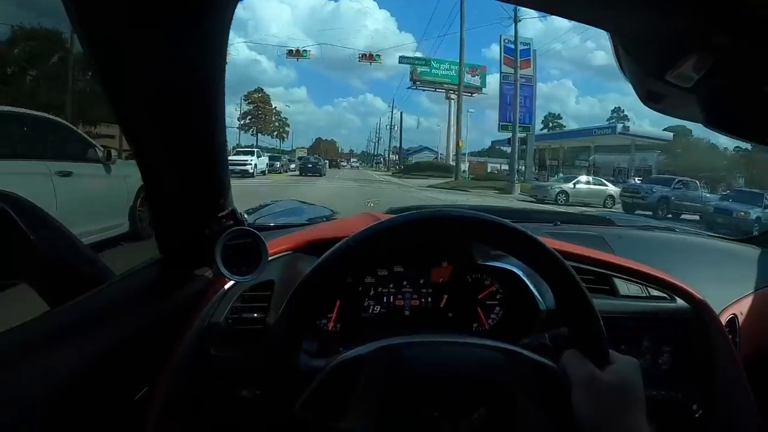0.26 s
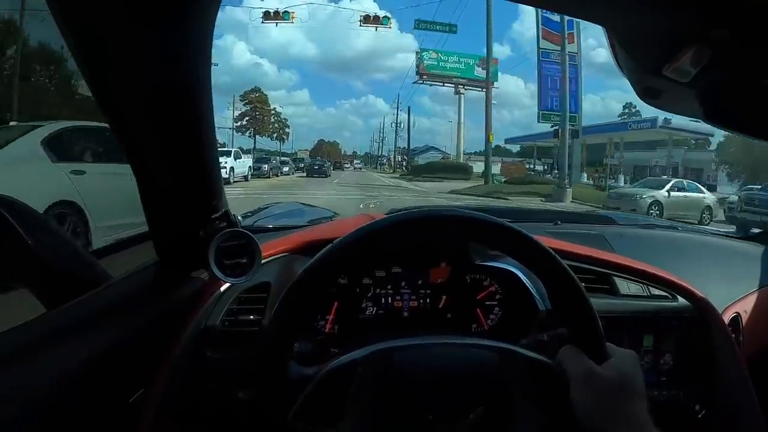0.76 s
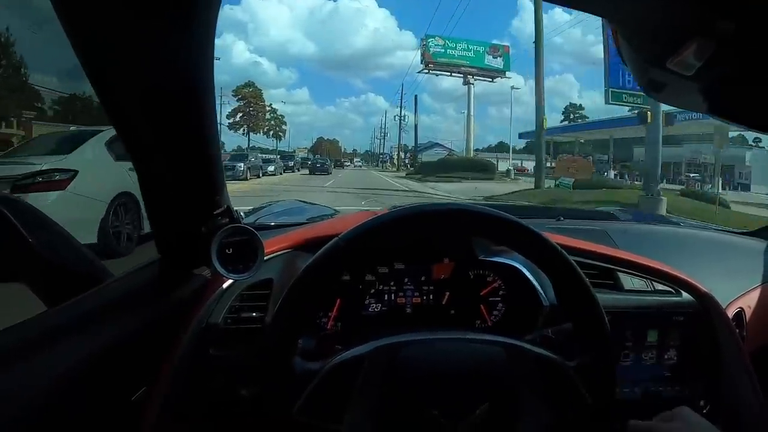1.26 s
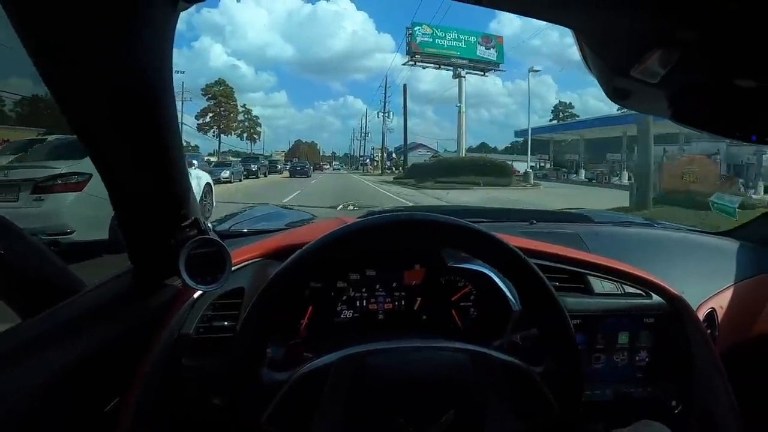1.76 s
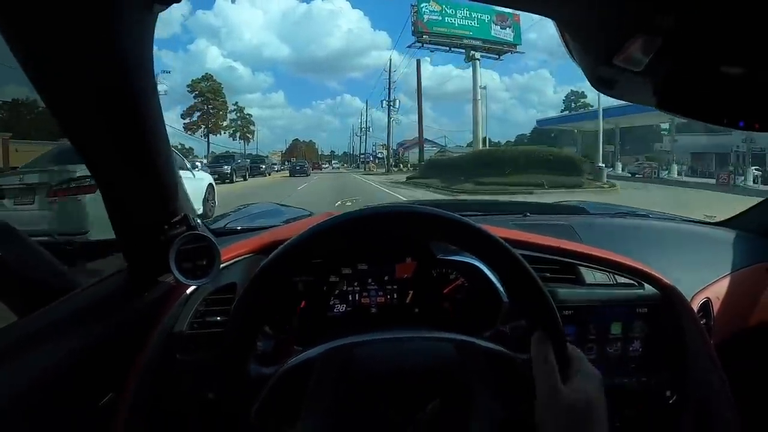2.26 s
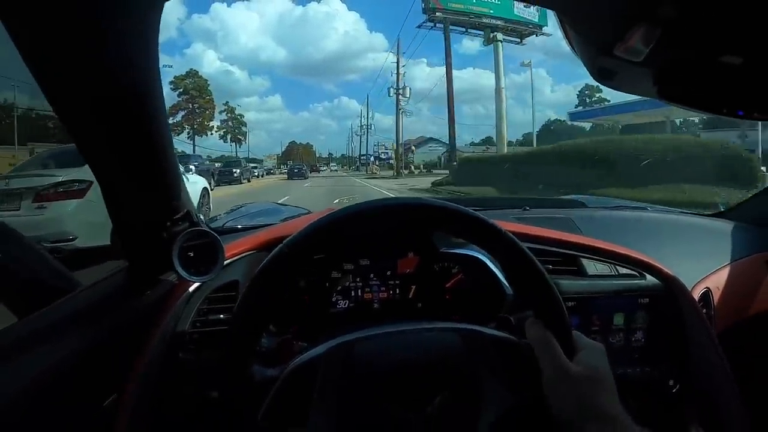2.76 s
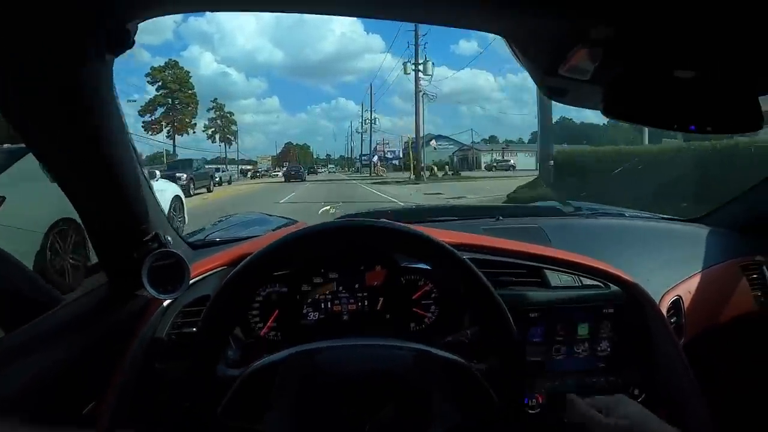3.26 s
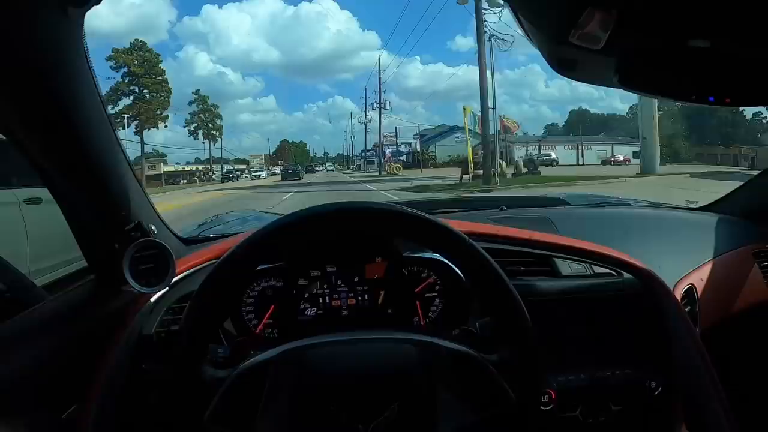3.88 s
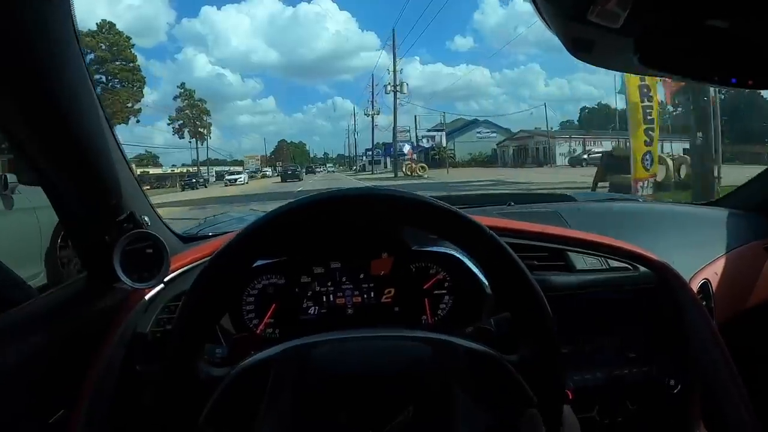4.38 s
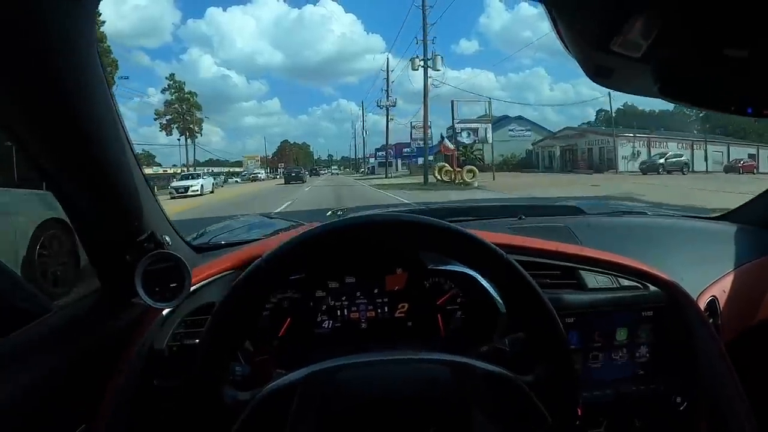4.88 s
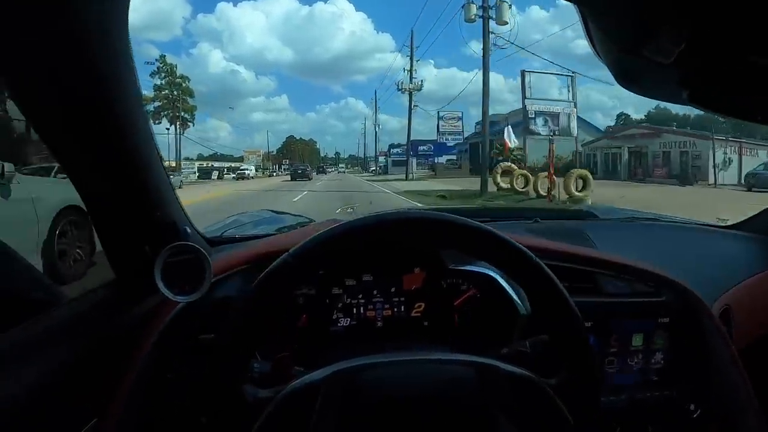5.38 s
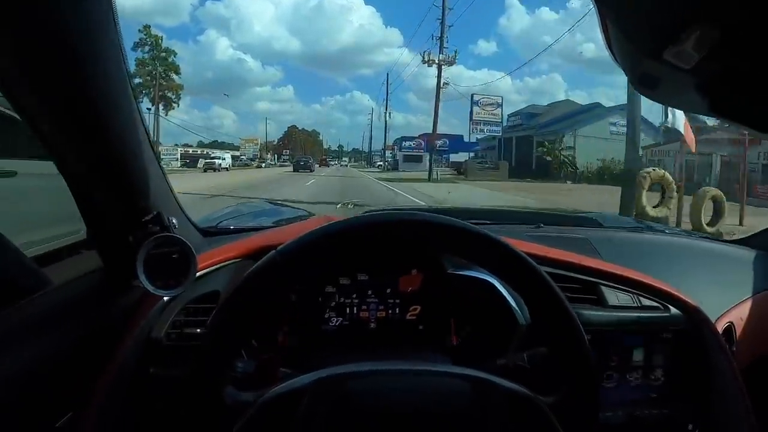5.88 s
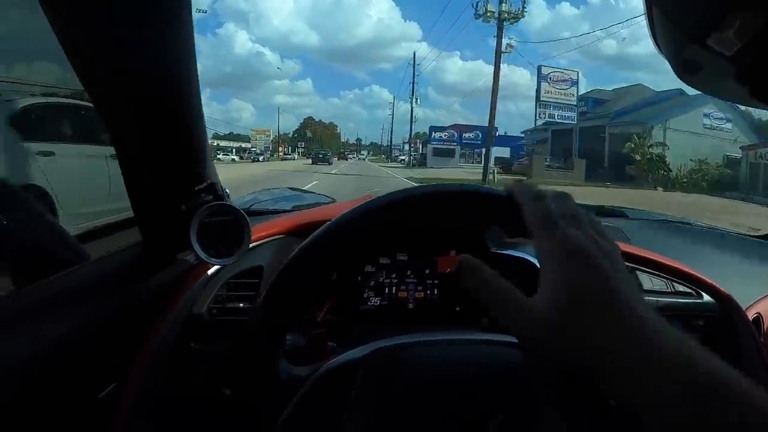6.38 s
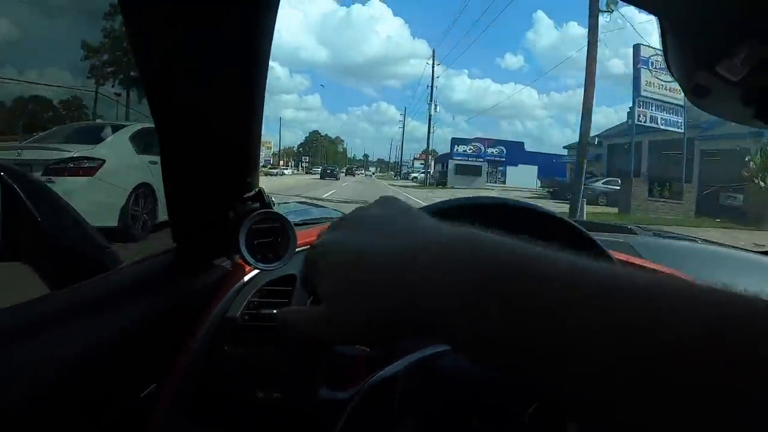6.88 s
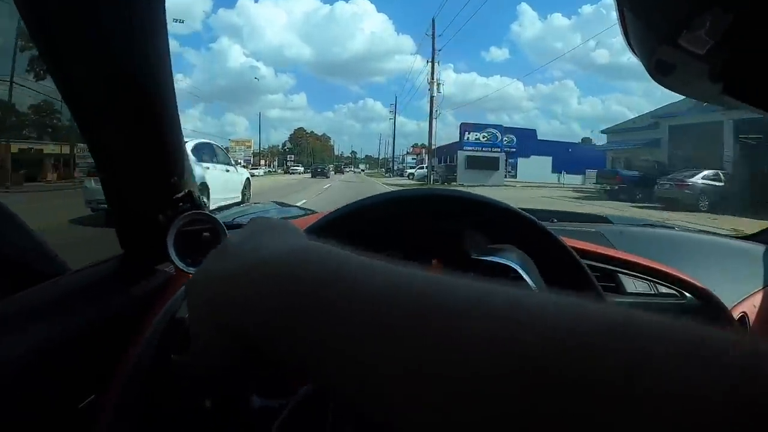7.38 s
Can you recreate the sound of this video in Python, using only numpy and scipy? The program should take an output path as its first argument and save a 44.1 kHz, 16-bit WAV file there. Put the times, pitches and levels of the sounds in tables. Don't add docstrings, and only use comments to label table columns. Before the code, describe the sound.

Close, boomy car-interior sound: low tyre and panel roar under a muffled eight-cylinder exhaust. The engine climbs under load with airy intake hiss, bursts into a hard pull, lifts off and shifts with dull drive-line knocks. A softer, uneven coasting rumble follows. Near six seconds a sharp blip and a weaker one flare up, then the note slides down, with a few dry clicks.

```python
import sys
import numpy as np
from scipy import signal
from scipy.io import wavfile
from scipy.ndimage import uniform_filter1d

SR = 44100
rng = np.random.default_rng(int(sys.argv[2]) if len(sys.argv) > 2 else 0)


def voltage_ratio(decibels):
    exponent = np.asarray(decibels, float) / 20
    return 10 ** exponent


def digitize_waveform(pressure):
    field = np.atleast_2d(pressure).T
    bounded = np.clip(field, -1, 1)
    quanta = np.round(bounded * 32767).astype(np.int16)
    wavfile.write(sys.argv[1], SR, quanta)


N = 336968
TIME = np.arange(N) / SR


def evened(x):
    return x / np.sqrt(np.mean(x ** 2) + 1e-20)


def smooth(x, first, second):
    return uniform_filter1d(uniform_filter1d(x, size=first), size=second)


def read(points, hz):
    f, value = np.transpose(points)
    return np.interp(np.log(hz + 1), np.log(f + 1), value)


def curves(rows, t=TIME):
    s, *columns = np.transpose(rows)
    return [np.interp(t, s, c) for c in columns]


def held(t, start, end, rise, fall):
    return np.clip(np.minimum((t - start) / rise, 1 - (t - end) / fall), 0, 1)


def bumps(rows, t=TIME):
    return sum(db * np.exp(-((t - s) / np.where(t < s, rise, fall)) ** 2) for s, db, rise, fall in rows)


def noise(spectrum, patchy_db):
    frames, hz = N // 512 + 8, np.fft.rfftfreq(2048, 1 / SR)
    real, imag, patches = rng.standard_normal((frames, 1025, 3)).T
    patches = uniform_filter1d(patches, size=12, axis=0)
    patches = evened(uniform_filter1d(patches, size=6, axis=1))
    level_db = read(spectrum, hz)[:, None] + patchy_db * patches
    z = (real + 1j * imag) * voltage_ratio(level_db)
    return evened(signal.istft(z, nperseg=2048, noverlap=1536)[1][:N])


# time in seconds, speed in rpm.
SPEED = [(0, 2102), (1.0, 2540), (2.0, 3038), (2.65, 3445), (2.78, 3698), (3.11, 4730), (3.22, 4780),
         (3.29, 4220), (3.4, 3950), (3.97, 3014), (4.3, 2830), (5.4, 2618), (5.8, 2455), (6.0, 2311),
         (6.06, 2450), (6.18, 3415), (6.4, 3260), (7.64, 1765)]
LURCH_S, LURCH_RPM, LURCH_HZ, LURCH_DECAY_S = 3.99, 90.3, 2.75, .4


def speed(t=TIME):
    since = np.maximum(t - LURCH_S, 0)
    swing = np.exp(-since / LURCH_DECAY_S) * np.sin(2 * np.pi * LURCH_HZ * since)
    return curves(SPEED, t)[0] + LURCH_RPM * swing


def cycles():
    return np.cumsum(speed()) / 120 / SR


# down in seconds, up in seconds, travel in seconds.
PEDAL = [
    (-1, 3.21, .035),
    (6.028, 6.208, .012),
    (6.295, 6.352, .014),
]
# down in seconds, up in seconds, travel in seconds, opening 0-1.
TOUCHES = [
    (3.879, 4.074, 0.054, 0.14),
    (5.7, 5.965, 0.063, 0.04),
    (6.954, 7.2, 0.056, 0.1),
]


def pedal(t=TIME):
    light = sum(np.clip(share, 0, 1) * held(t, down, up, travel, travel)
                for down, up, travel, share in TOUCHES)
    full = sum(held(t, down, up, travel, travel) for down, up, travel in PEDAL)
    return np.minimum(light + full, 1)


# time in seconds, gas flow in dB re full load, exhaust level in dB.
LOAD = [(0, -18, -34.5), (.5, -14.5, -30), (1.05, -10.5, -30.5), (1.4, -12.5, -27.5), (1.9, -14, -27),
        (2.3, -12, -29.5), (2.58, -8.5, -27.5), (2.77, -1, -24.5), (2.93, -2, -26.5), (3.08, 1.5, -26),
        (3.23, -0.5, -27), (3.27, -15, -28), (4.02, -15, -30), (4.2, -19, -31), (5.2, -19, -35),
        (5.9, -17, -30.5), (6.6, -19.5, -32), (7.64, -24, -37)]
# extra gas flow in dB, extra exhaust in dB.
BLIPS = [
    (14.5, 4.5),
    (8.5, 3),
]
BLIP_RISE_S, BLIP_FALL_S = 0.073, 0.041
BARK_S = .012


def load(t=TIME):
    flow_db, level_db = curves(LOAD, t)
    presses = list(zip(PEDAL[1:], BLIPS))
    blip_db = sum(db * held(t, a, b, BLIP_RISE_S, BLIP_FALL_S) for (a, b, _), (db, _) in presses)
    bark_db = sum(db * held(t, a, b, BARK_S, BARK_S) for (a, b, _), (_, db) in presses)
    return flow_db + blip_db, level_db + bark_db, blip_db


# time in seconds, depth in dB, width in seconds.
STUMBLES = [
    (3.27, 3.5, 0.018),
    (4.105, 11, 0.022),
    (4.25, 10, 0.02),
    (6.008, 8, 0.018),
    (6.245, 9, 0.018),
    (6.935, 7, 0.02),
]


def lost(t=TIME):
    return sum(db * np.exp(-((t - s) / width) ** 2) for s, db, width in STUMBLES)


# frequency in Hz, density in dB per Hz.
ROAD = [(20, -21), (40, -14.5), (65, -20.5), (90, -6), (200, -3), (350, -9), (600, -17.5), (900, -39),
        (1500, -41), (3500, -110)]
# time in seconds, swell in dB, rise in seconds, fall in seconds.
SHAKES = [
    (1, -6.5, 0.34, 0.65),
    (2.65, 0, 0.39, .2),
    (3.24, 9.5, 0.11, 0.16),
    (4, -1, 0.32, .4),
    (6.3, 2.5, .1, 0.44),
]
ROAR_DB = -27


def road():
    return voltage_ratio(ROAR_DB + bumps(SHAKES)) * noise(ROAD, patchy_db=2.5)


# time in seconds, peak in dB, length in seconds, dull above in Hz.
TICKS = [(0.185, -37.5, 0.026, 3000), (1.865, -45, 0.084, 8000), (2.018, -44, 0.053, 5000),
         (5.98, -44, .12, 2937), (6.815, -32, 0.077, 2501), (7.012, -39, 0.063, 2986),
         (7.265, -60, 0.048, 9000), (7.445, -61, 0.041, 8026)]


def ticks():
    out, t = np.zeros(N), np.arange(4000) / SR
    for s, db, t60_s, dull_hz in TICKS:
        level = voltage_ratio(db - 60 * t / max(t60_s, .005)) * np.minimum(t / 0.006, 1)
        crack = rng.standard_normal(len(t)) * level
        dull = signal.butter(2, dull_hz, fs=SR, output="sos")
        part = out[round(s * SR):][:len(t)]
        part += signal.sosfilt(dull, crack)[:len(part)]
    band = signal.butter(5, [1300, 10800], "band", fs=SR, output="sos")
    return signal.sosfilt(band, out)


# time in seconds, level in dB, frequency in Hz, t60 in seconds.
THUDS = [
    (3.22, -14.5, 94.9, 0.23),
    (4.125, -15, 97, 0.17),
    (4.272, -17, 91.86, 0.21),
    (6.248, -14, 97, 0.22),
]


def thuds():
    out, t = np.zeros(N), np.arange(SR // 2) / SR
    for s, db, hz, t60_s in THUDS:
        boom = voltage_ratio(db - 60 * t / t60_s) * np.sin(2 * np.pi * hz * t)
        out[round(s * SR):][:len(t)] += boom * (1 - np.exp(-t / 0.032))
    return out


# start in seconds, end in seconds, level in dB, fade in seconds.
WHINE = (3.97, 4.65, -60, .08)
# time in seconds, swell in dB, rise in seconds, fall in seconds.
WHINE_SWELLS = [
    (4.18, 6, .05, .05),
    (4.32, 9, .04, .16),
]
TEETH_PER_CYCLE = 59.3


def gears():
    start, end, db, fade = WHINE
    level = held(TIME, start - fade, end, fade, fade) ** 2 * voltage_ratio(db + bumps(WHINE_SWELLS))
    return level * np.sqrt(2) * np.cos(2 * np.pi * TEETH_PER_CYCLE * cycles())


def firing_puffs(firings):
    cylinder = voltage_ratio(2.0 * rng.standard_normal(8))[firings.astype(int) % 8]
    return smooth(0.87 + cylinder * np.exp(-(firings % 1) / 0.47), 50, 40)


def repeated_burns(firings):
    multiple = np.arange(513)
    heights = voltage_ratio(4 * rng.standard_normal(513) + 4 * (multiple % 4 == 0))
    heights = heights * (multiple > 40) * (multiple < 110)
    shape = np.fft.irfft(heights * np.exp(2j * np.pi * rng.random(513)))
    slip = .025 * evened(smooth(rng.standard_normal(N), 3000, 3000))
    place = (firings + slip) % 8 * 128
    return evened(np.interp(place, np.arange(1025), np.append(shape, shape[0])))


# frequency in Hz, density in dB per Hz.
RASP = [(400, -37), (640, -1), (730, -2.5), (800, 0), (890, -3), (1000, -7), (1120, -4), (1210, -13.5),
        (1350, -10.5), (1600, -18), (2100, -21), (2500, -27), (3200, -35), (5000, -68)]
RASP_DB = -29.58


def rasp(firings, puffs, flow_db):
    hz, throttle = np.fft.rfftfreq(N, 1 / SR), pedal()
    tones = np.fft.irfft(np.fft.rfft(repeated_burns(firings)) * voltage_ratio(read(RASP, hz)), N)
    puffed = evened(noise(RASP, patchy_db=2.0) * puffs)
    return voltage_ratio(RASP_DB + flow_db) * ((1.3 - .65 * throttle) * puffed + (1 + 3.3 * throttle) * tones)


# frequency in Hz, density in dB per Hz.
HISS = [(1200, -31), (2200, 0), (3000, -5), (4000, -7.5), (5000, -11), (6500, -22), (9000, -60)]
# frequency in Hz, density in dB per Hz.
AIR = [(3500, -26), (5500, -1), (6500, -2), (8000, -6), (9500, -9), (10500, -12), (11300, -18),
       (12000, -29), (13500, -45), (15000, -90)]
# time in seconds, swell in dB, rise in seconds, fall in seconds.
GULPS = [
    (.76, 8, .2, 0.21),
    (1.25, 2.5, 0.27, 0.3),
    (2.97, 1.5, 0.11, 0.081),
    (4.0, 2, .06, .04),
    (5.99, 8, .03, .025),
    (6.1, 5.5, 0.047, 0.026),
    (6.6, 3.5, .08, .08),
    (7.18, 7.5, .07, .06),
]
# time in seconds, swell in dB, rise in seconds, fall in seconds.
BYPASS = [
    (1.1, 2.5, 0.2, .3),
    (3.0, 1.5, .2, 0.15),
    (7.19, -5, .06, 0.068),
]
HISS_DB, AIR_DB = -46, -59.5
HISS_SHARE, AIR_SHARE = 0.84, 0.74


def intake(puffs, flow_db):
    gulp_db = bumps(GULPS)
    hiss_db = HISS_DB + HISS_SHARE * flow_db + gulp_db
    air_db = AIR_DB + AIR_SHARE * flow_db + gulp_db + bumps(BYPASS)
    hiss = evened(noise(HISS, patchy_db=-1.7) * (1.5 + puffs))
    return voltage_ratio(hiss_db) * hiss + voltage_ratio(air_db) * noise(AIR, patchy_db=.7)


def gas():
    firings, flow_db = 8 * cycles(), load()[0]
    puffs = firing_puffs(firings)
    return rasp(firings, puffs, flow_db) + intake(puffs, flow_db)


# multiple of the cycle rate, coasting in dB, pulling in dB.
ORDERS = [(2, -10, 6.5), (3, -5.5, -18), (4, 2.5, -7.5), (5, 4.5, -3), (6, 5.5, 2.5), (7, 6, 0.5),
          (8, 6.5, 13.5), (9, 2.1, 1), (10, 3.5, -1), (11, -6.5, 5), (12, 5, 0.6), (13, -7.5, -1.9),
          (14, 3, 7), (15, 4, 0.7), (16, 3, 11), (17, 2.5, -9), (18, 4.5, 3.5), (19, 2.5, -1.5),
          (20, -3, 3.2), (21, 4.5, -0.8), (22, 0, 6.5), (23, -1, -1), (24, -5.5, 7), (25, -10.5, 1),
          (26, 2, -16.5), (27, -1.5, 2.5), (28, -4.5, 4.5), (29, -0.5, -1), (30, -2.5, 4), (31, -8, 3),
          (32, -14.5, 4.5), (33, -18.5, 7), (34, -6, -1.5), (35, -22, 3.5), (36, -13, -14.5),
          (37, -10.5, 0.5), (38, 1, 5), (39, -11, -11), (40, -13, 0.5)]
# frequency in Hz, even coasting, even pulling, odd coasting, odd pulling, all in dB.
CABIN = [(52, -7.5, -24, -27.5, -4), (81, -2, -32, -6, -24.5), (91.86, 14, 11.5, 7.5, 15.5),
         (116.3, 1.5, 6.5, -2, 3.5), (137.6, 4.5, -3, -0.5, -11.5), (177, 1, 6, -3.5, -2.5),
         (210.5, 6, 3.5, -1, -4.5), (247.8, -16.5, -16.5, -18.5, -3.5), (301.2, -0.5, -1.1, -5.5, -1),
         (336.5, -11, 2.5, -5.5, -5.5), (369, -14.5, -4.5, -12, -5), (432, -6.5, -10, -13.5, -4),
         (558.5, -9, -8, -17, -9.5), (681, -24.5, -25, -22, -31.5)]
# frequency in Hz, gain in dB.
MUFFLER = [(700, -1.5), (740, 2.5), (810, -2), (900, 3.5), (1000, 1), (1110, 0.5), (1220, -17.5),
           (1700, -11.5)]
# speed in rpm, firing pulling, octave pulling, firing coasting,
# octave coasting, all in dB.
PIPES = [(1960, 7.5, -4.5, 7.5, -9), (2360, -1.5, 0, 4.5, 6), (2630, 0.5, 4, 1, 6.5),
         (2845, -5.5, -7, -1.5, 5.5), (3333, 8.5, 4, -3, -4.5), (3800, 16, 4, 6, -10),
         (4170, 11, 7.5, 11.5, 4), (4750, 1, 9, -1.5, -2)]
# from in seconds, to in seconds, unevenness in dB.
FREE = [
    (3.1, 4.3, 2.5),
    (5.9, 8, 1.5),
]
STEADY_DB, SETTLE_S, STRAIN_DB = 1.5, .2, 1.5
BITE_DB, BITE_SHARE, BITE_BLIP = 6.5, 0.5, 0.12
SHUDDER_DB, SHUDDER_RPM, SHUDDER_SPAN_RPM = 10.5, 3790, 500
BLIP_OVERTONES, BLIP_BETWEEN = 0.24, -0.13
PART_OPEN_DB = 4
FADING_DB, UPPER_STUMBLE = 3.5, .3


def exhaust():
    t, fine = TIME[::64], TIME[::8]
    rpm, throttle, (flow_db, level_db, blip_db) = speed(t), pedal(t), load(t)
    coasting = 1 - throttle
    pipes_db = curves(PIPES, rpm)
    firing_db, octave_db = throttle * pipes_db[:2] + coasting * pipes_db[2:]
    firing_db += PART_OPEN_DB * 4 * throttle * coasting
    free_db = sum(db * held(t, a, b, SETTLE_S, SETTLE_S) for a, b, db in FREE)
    uneven_db = STEADY_DB + free_db * coasting + STRAIN_DB * voltage_ratio(flow_db) * throttle
    bite_db = BITE_DB + BITE_SHARE * flow_db + BITE_BLIP * blip_db
    shudder_db = SHUDDER_DB * throttle * np.clip((rpm - SHUDDER_RPM) / SHUDDER_SPAN_RPM, 0, 1)
    knots_hz, *colours = np.transpose(CABIN)
    turn, out = 2 * np.pi * cycles()[::8], np.zeros(len(fine))
    for order, coast_db, pull_db in ORDERS:
        k = round(order)
        hz, odd = k * rpm / 120, k % 2
        coast, pull = (np.interp(np.log(hz), np.log(knots_hz), c) for c in colours[2 * odd:2 * odd + 2])
        db = coasting * (coast_db + coast) + throttle * (pull_db + pull)
        db += read(MUFFLER, hz) + (k > 17) * bite_db + (k < 6) * shudder_db
        db += blip_db * (BLIP_BETWEEN if k % 8 else BLIP_OVERTONES * (k > 8))
        db += level_db + 0.5 + (k == 8) * firing_db + (k == 16) * octave_db
        drift, sway = (evened(smooth(v, 40, 40)) for v in rng.standard_normal((len(t), 2)).T)
        waver = uneven_db * min(k / 14, 1.2) * (.3 if k % 8 == 0 else 1)
        db += waver * np.clip(drift, -3, 1.2)
        fading = np.clip(evened(uniform_filter1d(sway, size=250)), -2, 1.5)
        db += FADING_DB * (k > 17) * (fading - .3) * (1 - np.minimum(voltage_ratio(flow_db), 1))
        db -= lost(t) * (1 if k < 10 else UPPER_STUMBLE)
        offset = rng.uniform(-1, 1) * (np.pi if k > 9 else .5)
        phase = np.pi / 2 * odd + offset + waver * sway / 11
        tone = np.cos(k * turn + np.interp(fine, t, phase))
        out += np.sqrt(2) * np.interp(fine, t, voltage_ratio(db)) * tone
    return signal.resample_poly(out, 8, 1, window=("kaiser", 14))[:N]


def scene():
    roar = road() * voltage_ratio(-lost() / 2)
    return (roar + ticks() + thuds() + gears() + gas() + exhaust())[None]


def roll_off(x):
    return signal.sosfilt(signal.butter(12, 13500, fs=SR, output="sos"), x)


def record(dry):
    rounded = 1.3 * np.tanh(dry / 1.3)
    return roll_off(rounded)


dry = scene()
out = record(dry)
digitize_waveform(out)
```